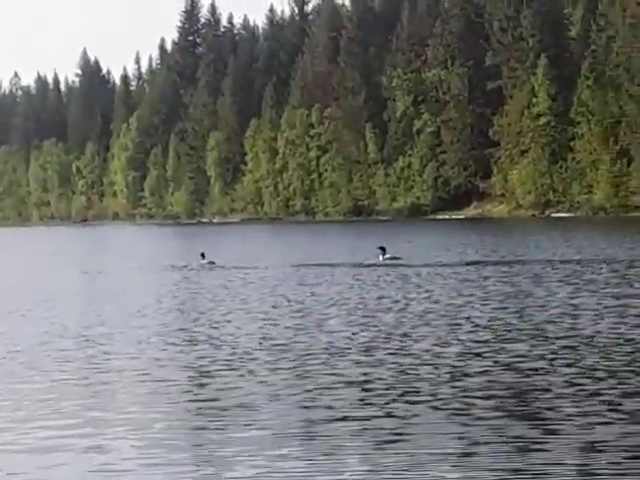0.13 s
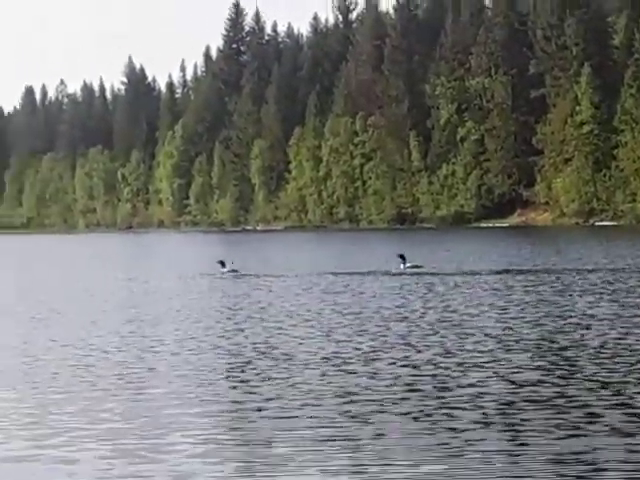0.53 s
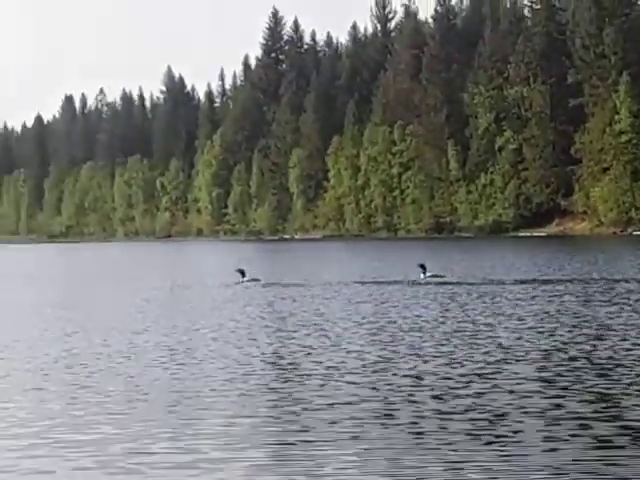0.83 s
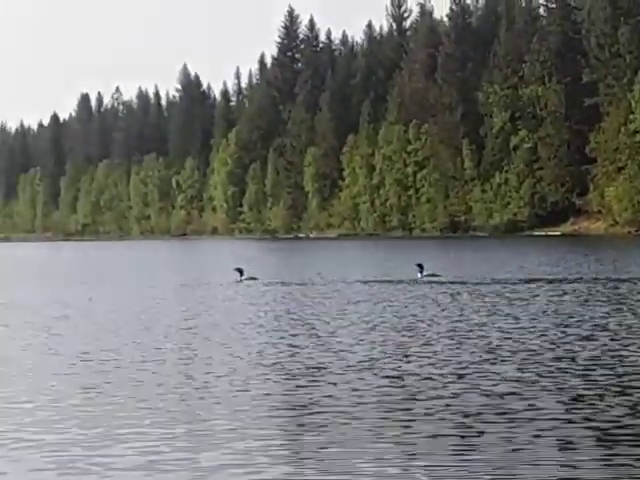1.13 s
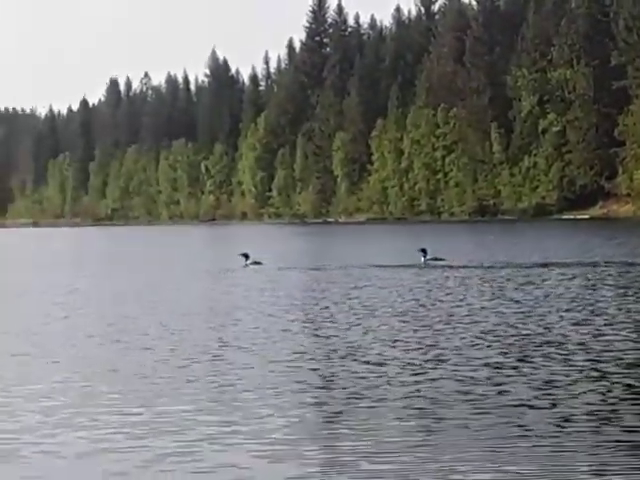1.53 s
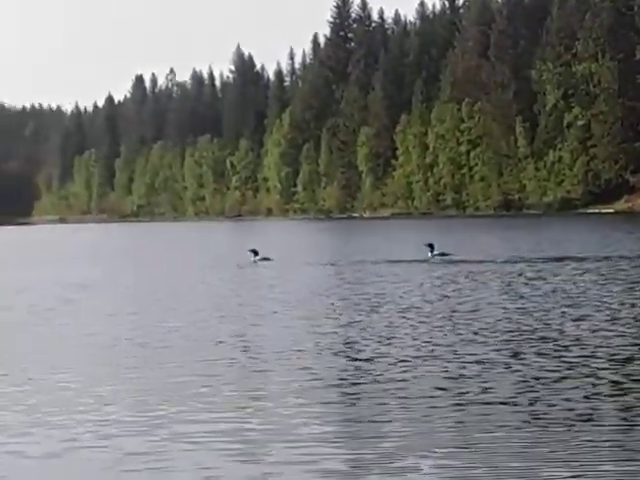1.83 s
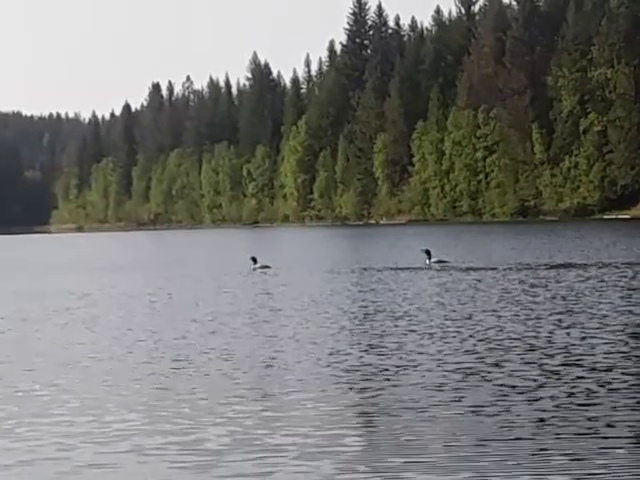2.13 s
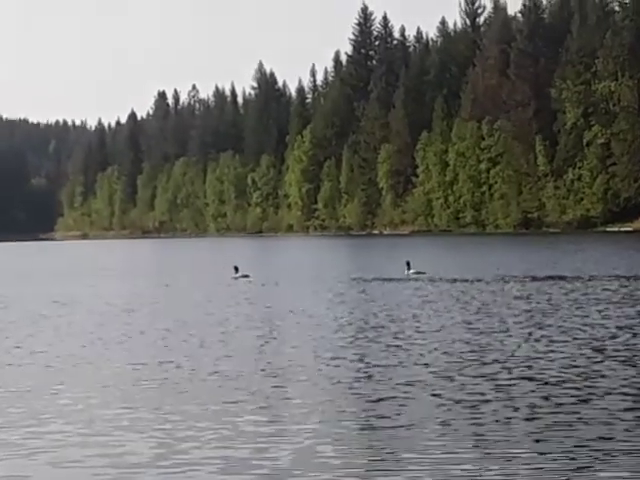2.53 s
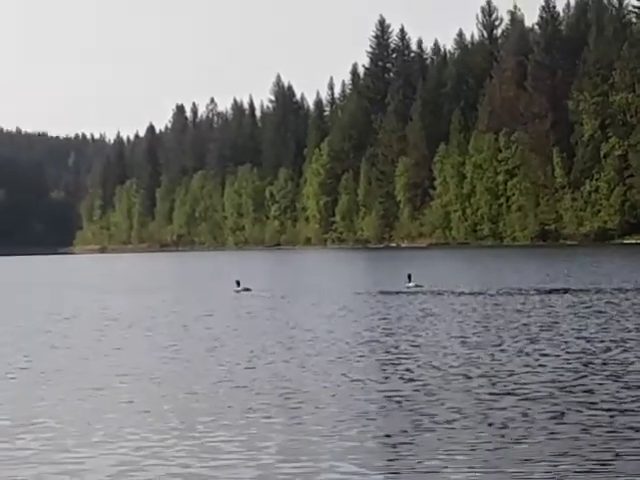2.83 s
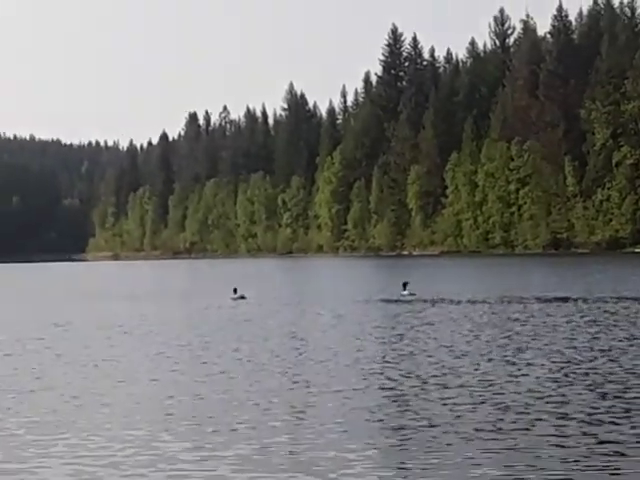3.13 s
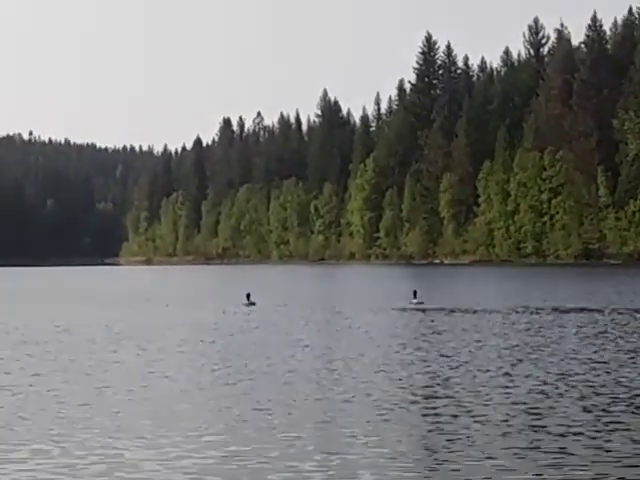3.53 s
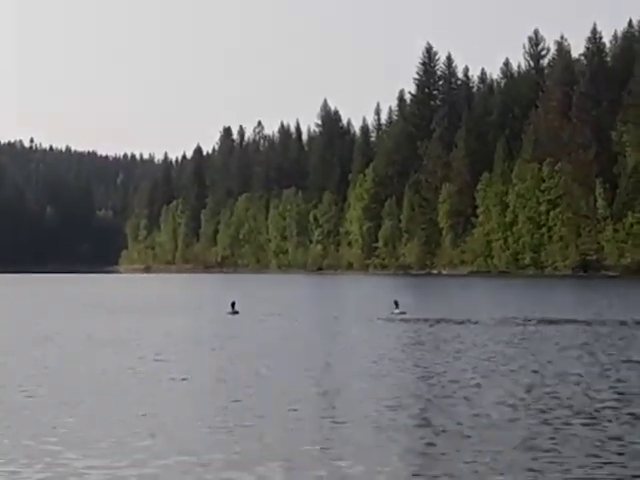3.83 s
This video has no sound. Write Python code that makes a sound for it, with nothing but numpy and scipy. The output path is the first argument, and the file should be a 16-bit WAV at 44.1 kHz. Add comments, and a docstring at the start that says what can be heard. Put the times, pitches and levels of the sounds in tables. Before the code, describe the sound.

Three quick bursts of trembling loon calls ring over open water, with blurred echoes from shore.

```python
"""First a faint low hum, soft hiss and the fading echo of an earlier call; then loons on a forest lake, two
and perhaps briefly a third, give three tremolo calls one after another, voices overlapping within each.
Each note is a stack of sines that wobbles about ten times a second, in a low or a high register, and short
rasps of noise mark most voice starts and breaks. The water scatters the calls and the wooded shore answers
late and blurred, both made with decaying noise. The hum is narrow noise bands, the hiss shaped noise."""
import sys
import numpy as np
from scipy import signal
from scipy.fft import rfft, irfft
from scipy.io import wavfile
from scipy.ndimage import uniform_filter1d

SR = 44100
rng = np.random.default_rng(int(sys.argv[2]) if len(sys.argv) > 2 else 0)


def generate_wav(signal):
    """Clip the signal to [-1, 1] and save it as 16-bit WAV at the path in sys.argv[1]."""
    frames = np.transpose(np.atleast_2d(signal))
    scaled = np.clip(frames, -1, 1) * 32767
    pcm = np.round(scaled).astype(np.int16)
    wavfile.write(sys.argv[1], SR, pcm)


N = 176400  # samples, 4 s


def amp(db):
    """Turn decibels into a plain multiplier."""
    return 10 ** (np.asarray(db) / 20)


def evened(x):
    """Scale a sound to an rms of 1."""
    return x / np.sqrt(np.mean(x ** 2) + 1e-20)


def read(points, hz):
    """Read a curve of (f/Hz, value) points, with straight lines along a log frequency scale."""
    f, value = np.transpose(points)
    return np.interp(np.log(hz + 1), np.log(f + 1), value)


def coloured(x, points):
    """Make some frequencies louder or softer, following a (f/Hz, level/dB) curve."""
    hz = np.fft.rfftfreq(x.shape[-1], 1 / SR)
    spectrum = rfft(x) * amp(read(points, hz))
    return irfft(spectrum, x.shape[-1])


def add(mix, s, sound):
    """Lay a sound into the mix from s seconds on, cut off at the end of the mix."""
    part = mix[round(s * SR):][:len(sound)]
    part += sound[:len(part)]


# How strong the noise is at each frequency, relative only: (f/Hz, level/dB)
NOISE_COLOUR = [(30, -26.5), (60, -20), (120, -4.5), (250, -14), (500, -9), (900, -16.5), (1500, -22.5),
                (2000, -32.5), (3000, -36.5), (5000, -40), (8000, -44.5), (11000, -42.5), (14000, -43),
                (15700, -36)]
# How alike the left and right noise are: (f/Hz, likeness from 0 to 1)
LEFT_RIGHT_LIKENESS = [(60, 0.99), (300, 0.97), (1000, 1), (3000, 0.33), (12000, .85)]
NOISE_DB = -60  # rms of the part between 250 and 600 Hz


def outdoor_noise():
    """Soft outdoor noise and microphone hiss: random spectra, shaped and partly shared by both ears."""
    frames, hz = N // 256 + 5, np.fft.rfftfreq(1024, 1 / SR)
    a, b, c, d = rng.standard_normal((frames, 513, 4)).T
    same = np.clip(read(LEFT_RIGHT_LIKENESS, hz), -1, 1)[:, None]
    left = a + 1j * b
    right = same * left + np.sqrt(1 - same ** 2) * (c + 1j * d)
    spectra = np.array([left, right]) * amp(read(NOISE_COLOUR, hz))[:, None]
    noise = signal.istft(spectra, nperseg=1024, noverlap=768)[1][:, :N]
    band = (hz > 250) & (hz < 600)
    share = np.sum(abs(spectra[:, band]) ** 2) / np.sum(abs(spectra) ** 2)
    return amp(NOISE_DB) * evened(noise) / np.sqrt(share)


# Bands of the hum: (f/Hz, width/Hz of each of two filters, rms level/dB before any swell,
# steady tone relative to the wavering part)
HUM_BANDS = [(90, 7.8, -55.5, .1), (108.3, 20, -52.5, 0.82), (164.4, 16, -60.5, .3), (209.2, 18, -52.5, 3),
             (236.3, 40, -61, 0.092), (308.5, 6.5, -68.5, 1.2)]
# Rise and fall of the bands below 130 Hz; only the distance from the average counts: (t/s, level/dB)
HUM_SWELL_CURVE = [(0.0, -53.5), (0.13, -43), (0.18, -55), (1.21, -46), (1.39, -55.5), (2.25, -42),
                   (3.97, -50), (4.0, -61)]


def hum():
    """A distant drone: slow noise moved up to each band's pitch makes it waver, and the lowest bands swell."""
    t, out = np.arange(N) / SR, np.zeros(N)
    s, db = np.transpose(HUM_SWELL_CURVE)
    for hz, width, level_db, steady_part in HUM_BANDS:
        r = np.exp(-np.pi * width / SR)
        waver = rng.standard_normal(N + SR) + 1j * rng.standard_normal(N + SR)
        for _ in range(2):
            waver = signal.lfilter([1], [1, -r], waver)
        waver = waver[SR:]  # drop the second in which the filters settle
        steady = steady_part * np.sqrt(np.mean(abs(waver) ** 2))
        swell = np.interp(t, s, db - db.mean()) * (hz < 130)
        band = ((waver + steady) * np.exp(2j * np.pi * hz * t)).real
        out += amp(level_db + swell) * evened(band)
    return out


def tail(start, rise, t60, db, width):
    """Echo made of stereo noise that swells after a delay and dies away, losing 60 dB in t60 seconds."""
    late = np.maximum(np.arange(3 * SR) / SR - start, 0)
    shape = (1 - np.exp(-late / rise)) * amp(-60 * late / t60)
    a, b = rng.standard_normal((2, len(late)))
    sides = np.array([a + width * b, a - width * b])  # width: how much differs left to right
    return amp(db) * shape / np.linalg.norm(shape) * sides


# Colour of the echo from the tree line: (f/Hz, level/dB)
TREE_LINE_COLOUR = [(500, -6), (1200, -1), (1600, 1.5), (2400, 3.5), (3600, -9), (6000, -18)]
# Colour of the long echo from the shores: (f/Hz, level/dB)
SHORE_ECHO_COLOUR = [(500, -8), (800, 5.5), (1200, 1), (1500, -0.5), (2000, -8.5), (2600, -11.5),
                     (6000, -29.5)]
# Strengths in dB are set before the colour and the left-right difference are added
TREES_S, TREES_RISE_S, TREES_T60_S, TREES_DB = 0.56, 0.03, 0.6, -29
SHORE_S, SHORE_RISE_S, SHORE_T60_S, SHORE_DB = 0.29, 0.29, 4.4, -30
NEAR_RISE_S, NEAR_T60_S, NEAR_DB = 0.0021, 0.42, -26.5  # scatter off the water near the birds
SHORE_WIDTH, NEAR_WIDTH = 0.3, 0.39
PREVIOUS_S, PREVIOUS_DB = 1.45, -3  # a like call this much before the first one, heard only as echo
LEAD = 2 * SR  # samples of time before the scene starts


def lake(calls):
    """Short scatter off the water, a late return from the tree line and the long echo of the shores."""
    heard = np.concatenate([np.zeros(LEAD), calls])
    previous_call = amp(PREVIOUS_DB) * calls[:round(1.3 * SR)]
    add(heard, LEAD / SR - PREVIOUS_S, previous_call)
    trees = tail(TREES_S, TREES_RISE_S, TREES_T60_S, TREES_DB, SHORE_WIDTH)
    shores = tail(SHORE_S, SHORE_RISE_S, SHORE_T60_S, SHORE_DB, SHORE_WIDTH)
    water = tail(0, NEAR_RISE_S, NEAR_T60_S, NEAR_DB, NEAR_WIDTH)
    echo = coloured(trees, TREE_LINE_COLOUR) + coloured(shores, SHORE_ECHO_COLOUR) + water
    return signal.fftconvolve(heard[None], echo, axes=1)[:, LEAD:LEAD + N]


# Short rasps of noise, most where a voice starts or breaks: (middle t/s, level/dB, length/s)
RASP_PUFFS = [(.412, -48, .012), (.486, -46, .015), (.546, -38, .015), (1.932, -50, .012), (2.2, -42, .015),
              (3.378, -46, .012), (3.512, -46, .01), (3.744, -40, .012)]
# Colour of the rasp noise: (f/Hz, level/dB)
RASP_COLOUR = [(400, -30), (700, -4), (1400, 0), (2000, -14), (3300, -30), (5000, -48), (8000, -70)]


def rasps():
    """Puffs of coloured noise, most where a voice starts or breaks, each fading in and out."""
    puffs = np.zeros(N)
    noise = evened(coloured(rng.standard_normal(N), RASP_COLOUR))
    for s, db, length in RASP_PUFFS:
        add(puffs, s - length / 2, amp(db) * np.hanning(round(length * SR)))
    return puffs * noise


def drift(size, span=150):
    """Random wander of rms 1: noise averaged twice over span samples."""
    once = uniform_filter1d(rng.standard_normal(size), int(span))
    return evened(uniform_filter1d(once, int(span)))


WAVER, WAVER_DB = 0.0018, 0.57  # rms wander of the pitch (fraction) and of the level (dB)
FLICKER_DB, BREATH = 2, 0.14  # wander of overtone level (dB rms); breath per octave above 1500 Hz
OVERTONE_HZ = 1900  # only partials that reach above this get overtone colour
TROUGH_SHARPNESS = 1.25  # troughs are narrower than crests
EDGE_S, EFFORT = 0.0082, 0.98  # fade in and out; overtones grow faster than the level


def note(octave_db, lift_db, points, voice, throat):
    """A stack of sines whose pitch swings between round crests and narrower troughs."""
    s, hz, db = np.transpose(points)
    t = np.arange(s[0], s[-1], 1 / SR)
    k = np.clip(np.searchsorted(s, t, "right") - 1, 0, len(s) - 2)  # the swing we are in
    u = np.clip((t - s[k]) / (s[k + 1] - s[k]), 0, 1)  # how far through it, 0 to 1
    rising = hz[k + 1] > hz[k]
    arch = np.sin(np.pi / 2 * np.where(rising, u, 1 - u)) ** TROUGH_SHARPNESS
    blend = np.where(rising, arch, 1 - arch)
    smooth_pitch = uniform_filter1d(hz[k] + blend * (hz[k + 1] - hz[k]), 200)
    pitch = smooth_pitch * (1 + WAVER * drift(len(t)))
    smooth_level = uniform_filter1d(db[k] + blend * (db[k + 1] - db[k]), 200)
    level = smooth_level + WAVER_DB * drift(len(t))
    turn = 2 * np.pi * (np.cumsum(pitch) / SR + rng.random())
    upper = lift_db + EFFORT * (level - db.max())  # dB per octave above 1500 Hz
    tone = np.zeros(len(t))
    for m, partial_db in voice:
        octaves = np.clip(np.log2(m * pitch / 1500), 0, None) * (m > 2.5)
        colour = upper * octaves + read(throat, m * pitch) + FLICKER_DB * drift(len(t), 350)
        breath = 1 + BREATH * octaves * drift(len(t), 51)
        strength_db = partial_db + (m == 2) * octave_db + (m * hz.max() > OVERTONE_HZ) * colour
        tone += amp(strength_db) * breath * np.sin(m * turn)
    edge = np.clip(np.minimum(t - s[0], s[-1] - t) / EDGE_S, 0, 1)
    fade = np.sin(np.pi / 2 * edge) ** 2
    return s[0], np.sqrt(2) * amp(level) * fade * tone


# Low-register notes: (extra level/dB of the second partial, lift of higher overtones/dB per octave,
# throat colour and side A or B,
# crests and troughs of the wobble: (t/s, f/Hz, level/dB before the voice's mix of partials))
LOW_CALLS = [ (4, 6, "A", [(.415, 690, -43), (.445, 748, -35), (.488, 666.6, -43), (.523, 805, -30),
             (.535, 823, -33.5), (.556, 885, -35.5)]), (-2.5, -1.5, "B", [(.425, 700, -48), (.45, 700, -39),
             (.495, 681.2, -37), (.535, 840.7, -27.5), (.548, 837, -23.5)]),
             (-6.5, 7, "A", [(1.01, 625, -38.5), (1.055, 680, -34.5), (1.115, 600, -43.5),
             (1.14, 630, -47.5), (1.16, 600, -36.5)]), (-9.5, -8.5, "A", [(1.93, 690, -58),
             (1.98, 850, -56.5), (2.0, 830, -74.5)]), (1.5, 5, "B", [(2.022, 700, -37.5),
             (2.055, 757, -33.5), (2.093, 685, -35), (2.13, 812, -30), (2.16, 765, -35.5)]),
             (-2.5, 2, "A", [(2.005, 610, -46.5), (2.025, 681.6, -40.5), (2.055, 715, -39.5),
             (2.105, 672, -35), (2.147, 820, -28), (2.177, 713, -39), (2.195, 800, -32.5),
             (2.207, 880, -37.5)]), (-6, -5, "A", [(2.598, 615, -40), (2.645, 620, -45), (2.71, 600, -45)]),
             (-2.5, -5, "B", [(3.29, 640, -45.5), (3.345, 814, -28.5), (3.385, 770, -40.5)]),
             (3.5, -1.5, "A", [(3.572, 680, -40), (3.61, 635, -48.5), (3.668, 802, -31), (3.707, 712, -39),
             (3.735, 820, -34.5), (3.747, 900, -32.5)]), (-7, -9.5, "A", [(3.865, 680, -33),
             (3.905, 785, -38), (3.918, 785, -54.5)]), ]
# High-register notes, same columns
HIGH_CALLS = [ (0, -1, "A", [(.55, 1194, -22), (.585, 1036, -22.5), (.635, 1213, -19), (.685, 1062, -20.5),
              (.735, 1225, -18.5), (.787, 1037, -20.5), (.835, 1218, -19), (.895, 1002, -23),
              (.94, 1206, -20), (.985, 1014, -23), (1.01, 908, -27)]), (0, -1, "B", [(.537, 1194, -21),
              (.578, 997.6, -20), (.613, 1228, -20.5)]), (0, -2.5, "B", [(.608, 1371, -26),
              (.625, 1438, -14), (.668, 1280, -27.5), (.715, 1442, -15), (.763, 1265, -28.5),
              (.808, 1411, -15.5), (.858, 1239, -31), (.902, 1391, -16.5), (.945, 1165, -36)]),
              (0, -1, "B", [(.96, 1021, -19), (.998, 1116, -19), (1.06, 910, -31.5), (1.1, 935, -30.5),
              (1.14, 910, -35.5)]), (0, -5, "B", [(2.155, 1220, -20), (2.198, 995, -21),
              (2.245, 1205, -19.5), (2.3, 999, -23.5), (2.345, 1210, -18), (2.4, 980, -25.5),
              (2.445, 1150, -23), (2.505, 960.6, -28.5), (2.55, 1083, -21.5), (2.6, 950, -25),
              (2.645, 1088, -23), (2.695, 930, -32)]), (0, 0.5, "A", [(2.203, 1188, -11),
              (2.222, 1220, -21), (2.275, 1050, -20), (2.32, 1228, -18), (2.375, 1037, -21),
              (2.42, 1224, -18), (2.483, 997, -20), (2.525, 1218, -20), (2.59, 945, -34.5),
              (2.602, 945, -33)]), (0, -9, "B", [(3.375, 1002, -32), (3.39, 1008, -25),
              (3.435, 1218, -20.5), (3.483, 1010, -22), (3.512, 1201, -25.5), (3.525, 1194, -40.5)]),
              (0, -15, "B", [(3.51, 1387, -16.5), (3.525, 1448, -16), (3.572, 1260, -31), (3.62, 1437, -16),
              (3.668, 1228, -31), (3.717, 1418, -17.5), (3.765, 1238, -35.5), (3.81, 1385, -19.5),
              (3.85, 1265, -32.5)]), (0, -0.5, "A", [(3.745, 1185, -12), (3.757, 1212, -20.5),
              (3.808, 1058, -20), (3.855, 1210, -19), (3.91, 1040, -20), (3.955, 1232, -22),
              (4.01, 1050, -20.5)]), (0, -6.5, "B", [(3.885, 1001, -47), (3.915, 1104, -25),
              (3.96, 912, -30)]), ]
# Mix of partials in each register: (multiple of the pitch, level/dB)
LOW_PARTIALS = [(1, 1), (2, 3), (3, -22), (4, -28.5), (5, -29), (6, -38), (7, -44), (8, -46), (9, -48.5)]
HIGH_PARTIALS = [(1, 0), (2, -30), (3, -27), (4, -47), (5, -54), (6, -42), (7, -48)]
# The same for notes that crest above TOP_HZ: (multiple of the pitch, level/dB)
TOP_PARTIALS = [(1, -3), (2, -39.5), (3, -45.5), (4, -42.5), (5, -62.5), (6, -55)]
# Two throat colours for the overtones, A and B: (f/Hz, level/dB)
THROAT_COLOURS = { "A": [(1900, -6), (2400, -1.5), (2850, -13.5), (3200, -12), (3650, 0), (4000, -6.5),
                  (4350, -6), (4900, 0), (5500, 3.5), (6000, -3.5), (6600, -4.5), (7300, -7), (8500, -3.5),
                  (10000, -2.5)], "B": [(1900, -11.5), (2400, 0), (2850, -15), (3300, -0.5), (3650, -2.5),
                  (3950, -6), (4350, 7.5), (4800, -5), (5500, 6), (6000, -8), (6600, -16.5), (7300, -7.5),
                  (10000, -12)], }
TOP_HZ = 1340
PAN_DB = {"A": 0.5, "B": 0.36}  # left raised and right lowered by this much


def loons():
    """All notes, using two throat colours, each with its own left-right balance."""
    out = np.zeros((N, 2))
    for notes, register in ((LOW_CALLS, LOW_PARTIALS), (HIGH_CALLS, HIGH_PARTIALS)):
        for octave_db, lift_db, throat, points in notes:
            crest_hz = max(hz for s, hz, db in points)
            voice = TOP_PARTIALS if crest_hz > TOP_HZ else register
            start, sound = note(octave_db, lift_db, points, voice, THROAT_COLOURS[throat])
            add(out, start, sound[:, None] * amp([PAN_DB[throat], -PAN_DB[throat]]))
    return out.T


RIGHT_LEAD_S = 1e-5  # calls reach the right side this much before the left


def scene():
    """Noise, hum, lake echo and the direct calls; adding a little of a wave's slope shifts it in time."""
    calls = rasps() + loons()
    shift = RIGHT_LEAD_S * SR / 2 * np.gradient(calls, axis=1) * [[-1], [1]]
    return outdoor_noise() + hum() + lake(calls.mean(0)) + calls + shift


LOW_CUT_HZ, EDGE_HZ = 48, 15750


def record(dry):
    """A gentle low cut that thins the deepest rumble, then a cut of everything above the band limit."""
    low_cut = signal.butter(2, LOW_CUT_HZ, "high", fs=SR, output="sos")
    thin = signal.sosfilt(low_cut, dry)
    band_limit = signal.firwin(511, EDGE_HZ, window=("kaiser", 9), fs=SR)
    return signal.oaconvolve(thin, band_limit[None], "same")


dry = scene()
out = record(dry)
generate_wav(out)
```